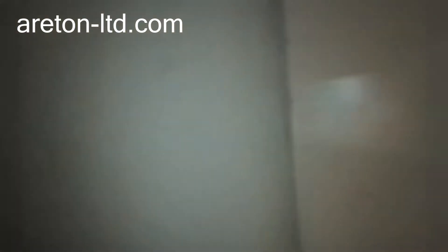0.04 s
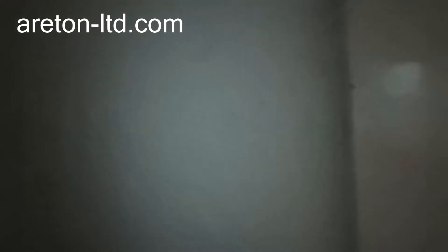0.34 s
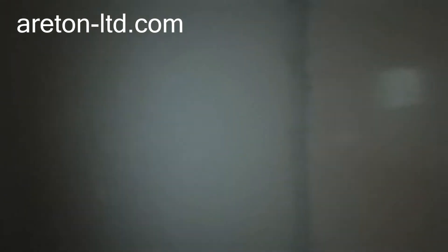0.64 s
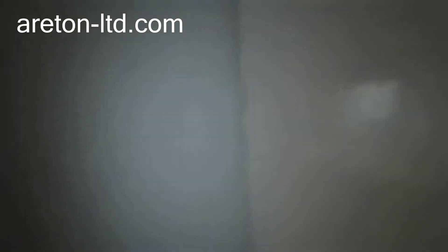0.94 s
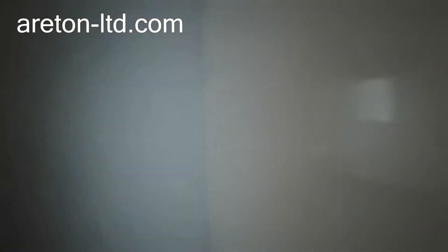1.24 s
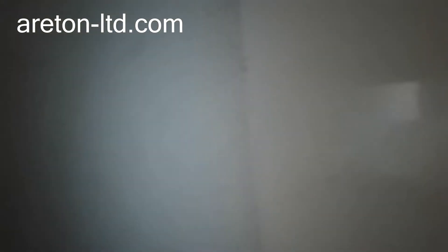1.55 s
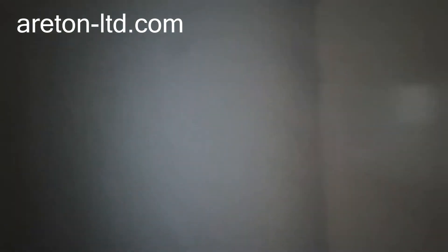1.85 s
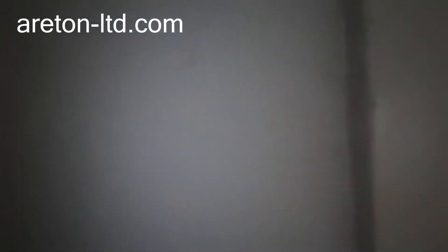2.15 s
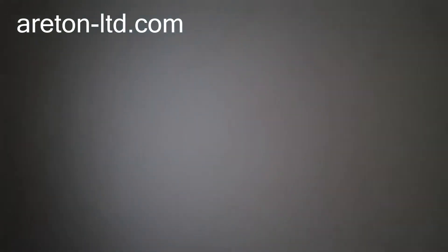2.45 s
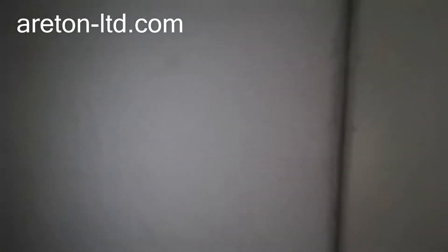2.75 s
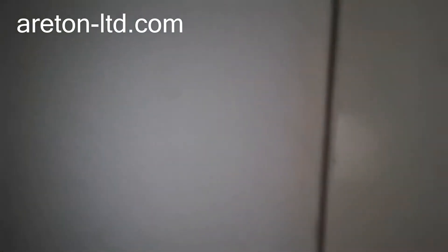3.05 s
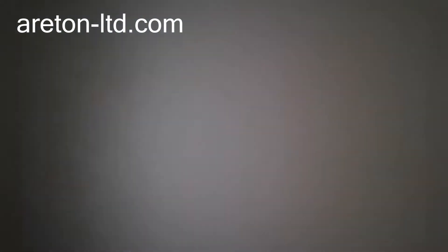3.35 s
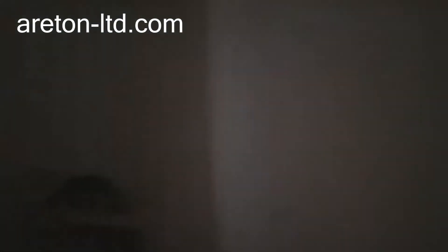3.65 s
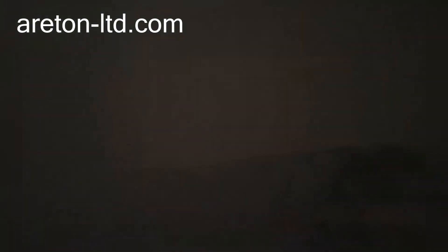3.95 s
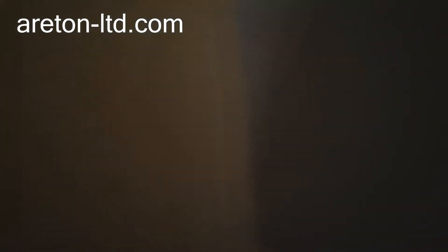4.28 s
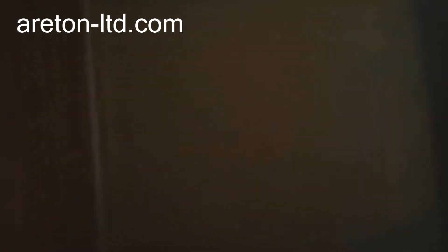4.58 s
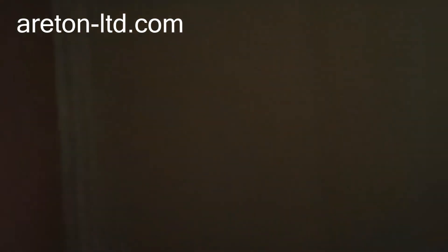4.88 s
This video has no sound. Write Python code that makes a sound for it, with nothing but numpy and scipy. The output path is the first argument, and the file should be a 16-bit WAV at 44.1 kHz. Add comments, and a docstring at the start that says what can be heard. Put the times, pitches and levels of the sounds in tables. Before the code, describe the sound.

A sharp latch clack and a hollow wooden knock start things off, close to the microphone in a small room with a short echo. Lighter knocks and faint, high hinge squeaks follow. From about 1 to 1.5 seconds the handle and latch knock and rattle again, and the hinge gives two brief, low creaks near 1.7 and 2.1 seconds. A sleeve and hand rub in short strokes throughout. After a scuff and more knocks around 2.5 seconds, the loudest blows land between 2.8 and 3 seconds, cracking sharply and setting the whole door booming as it is pushed open. Another thump comes at 3.2 seconds, while moving air rumbles on the microphone. From about 4 seconds, soft footsteps thud and scuff on the floor, with a light metal clink near 4.4 seconds and a last step around 4.8 seconds.

```python
"""Knocks of handle and latch set a wooden door booming as it is pushed open, close by in a small room.
Each blow cracks, rattles the latch and rings the hollow panel and the whole door leaf.
Sleeve and hand rub in strokes, and moved air rumbles on the microphone.
The hinge sticks and slips in low creaks and faint squeaks; then come soft footfalls
and a light clink of metal."""
import sys
import numpy as np
from scipy import signal
from scipy.fft import rfft, irfft
from scipy.io import wavfile
from scipy.ndimage import uniform_filter1d

SR = 44100
rng = np.random.default_rng(int(sys.argv[2]) if len(sys.argv) > 2 else 0)


def pcm_store(signal):
    """Save signal as 16-bit PCM."""
    levels = np.round(np.clip(np.atleast_2d(signal), -1, 1) * 32767)
    wavfile.write(sys.argv[1], SR, levels.astype(np.int16).T)


N = 225683
T = np.arange(N) / SR
RING = T[:SR]  # one second for a single sound to ring out

# Blows of handle, latch and leaf. Each row: start in seconds, boom level in dB, panel level in dB,
# crack level in dB, contact pitch in Hz, crack decay (t60) in seconds.
KNOCKS = [(.001, -33.5, -32, -24.5, 1640, .23), (.264, -43.5, -43, -44.5, 1520, .19),
          (.46, -47, -53, -54, 2300, .11), (.573, -48.5, -54.5, -51.5, 3000, .04),
          (1.007, -72, -27.5, -24.5, 980, .063), (1.019, -33.5, -55, -40, 1010, .065),
          (1.133, -34, -35, -41, 3470, .15), (1.364, -32, -25.5, -26.5, 2970, .085),
          (1.472, -37.5, -37.5, -34, 1550, .042), (1.69, -42.5, -47, -25.5, 5560, .04),
          (1.863, -49, -43, -48.5, 3440, .11), (2.177, -44.5, -58, -44, 2110, .25),
          (2.405, -44, -44, -44.5, 4900, .05), (2.482, -44.5, -58, -42.5, 6040, .24),
          (2.524, -29.5, -41, -39.5, 2300, .11), (2.576, -25.5, -38.5, -41, 1222, .075),
          (2.775, -15.5, -17, -12.5, 3670, 0.088), (2.928, -34, -36, -16, 3400, .075),
          (2.940, -18.5, -16, -10, 6150, .031), (2.948, -40.5, -26.5, -19, 5630, .045),
          (3.238, -20.5, -25, -29, 2070, .1), (3.279, -30, -34, -27.5, 3290, 0.034)]
# Deep modes of the door leaf. Each row: pitch in Hz, level in dB, t60 in seconds.
LEAF_MODES = [(52.25, -8.5, 0.53), (107.3, 2.5, 0.18), (134, 0.5, 0.16), (173.5, 4, 0.58),
              (175, -15.5, 0.067), (240.9, -4.5, 0.38), (247.6, -3, 0.39), (301.4, -11.5, 0.64),
              (331.6, -3, 0.48), (359, -6, 0.13), (405, -11.5, 0.46)]
# Boxy modes of the hollow panel. Each row: pitch in Hz, level in dB, t60 in seconds.
PANEL_MODES = [(446, -2, 0.097), (483, -4, 0.14), (537, -4.5, .24), (666.4, -2, 0.088), (808.3, -5.5, 0.18),
               (852, -1, 0.072), (907, -6, 0.1), (930, -18.5, 0.19), (1017, -8.5, 0.2), (1088, 1, 0.083),
               (1169, -13.5, 0.38), (1266, -3, 0.11), (1346, -7, 0.13), (1451, -4.5, 0.18)]
NARROW_BLUR = .002  # width of a nearly pure mode, as a share of its pitch


def door_knocks(latch_db=-21, latch_t60=.16, spring_db=-27, snap_db=-3, snap_t60=0.039, contact_db=2):
    """Each blow snaps, rattles latch and panel, and sets the leaf booming. Returns cracks and body."""
    # Latch metal, damped evenly by the wood around it. Each row: pitch in Hz, level in dB.
    latch_partials = [(1798, 3), (1897, 3), (2040, 0), (2170, 3), (2586, 5.5), (3060, -3.5), (3408, -1),
                      (3860, 0), (4640, 1), (5439, 0), (5586, 1.5), (5826, -2.5), (6433, -11.5), (7068, -6),
                      (13600, 4.5)]
    # The latch spring sings on faintly. Each row: pitch in Hz, level in dB, t60 in seconds.
    spring_modes = [(707, 1, 0.37), (949, -9, 1), (1206, -1, .45)]
    # EQ of the crack of wood and latch. Each row: frequency in Hz, gain in dB.
    crack_eq = [(100, -15), (350, 5.5), (650, -3.5), (1000, 3.5), (1350, 2.5), (2100, 6.5), (3000, 4.5),
                (4500, 1.5), (5700, 5.5), (7000, 1.5), (8300, -0.5), (10000, -3), (12000, -17),
                (15000, -2.5)]
    latch_modes = [(hz, db + latch_db, latch_t60) for hz, db in latch_partials]
    cracks, body = np.zeros((2, N)), np.zeros((2, N))
    boom = ring(LEAF_MODES, NARROW_BLUR) * rise(0.0026) / 2
    for start, boom_db, panel_db, crack_db, contact_hz, t60 in KNOCKS:
        wood = rng.standard_normal((2, SR)) * (fade(t60) + undb(snap_db) * fade(snap_t60))
        # the struck spot adds a broad, short resonance of its own
        contact = undb(contact_db) * around(wood * fade(t60), contact_hz, spread=1.25)
        latch = ring(latch_modes, blur=.012)
        spring = undb(spring_db) * ring(spring_modes, NARROW_BLUR)
        crack = (wood + contact + latch + spring) * rise(0.00086)
        # a softer contact leaves the high modes quiet
        add(cracks, start, undb(crack_db) * band(crack, 1.34 * contact_hz, "low"))
        panel = ring(PANEL_MODES, blur=0.021) * rise(0.0047) / 2
        add(body, start, undb(panel_db) * panel + undb(boom_db) * boom)
    return colour(cracks, crack_eq), band(body, 1300, "low")


def door_bumps(leaf_db=-7):
    """A soft blow on the door thuds and leaves the leaf's modes near its pitch ringing."""
    # Each row: start in seconds, level in dB, pitch in Hz.
    bumps = [(0.029, -40.5, 225), (1.674, -40, 172), (1.697, -32, 340), (1.874, -41.5, 180),
             (2.17, -43.5, 365), (2.799, -17, 124), (2.813, -26, 309), (2.93, -14, 114.4),
             (3.242, -21, 123.5), (3.51, -45, 216)]
    out = np.zeros((2, N))
    for start, db, hz in bumps:
        blow = thud(hz, cycles=24)
        leaf = around(ring(LEAF_MODES, NARROW_BLUR), hz, spread=1.25)
        add(out, start, undb(db) * (blow + undb(leaf_db) * leaf))
    return out


def moved_air(level_db=-1, draught_db=-52, pump_db=-1.5, attack=0.7):
    """Swings and blows push air over a steady draught; both channels get the same rumble."""
    # Swings of door and hand. Each row: start in seconds, length in seconds, level in dB.
    swings = [(0, 0.15, -37), (0.418, 0.065, -40.5), (0.613, 0.15, -44), (1.087, 0.051, -29.5),
              (1.251, 0.068, -26), (2.46, 0.061, -30.5), (2.556, 0.061, -17.5), (2.967, 0.22, -22.5),
              (3.248, 0.086, -17), (3.395, 0.15, -32), (3.667, 0.065, -42), (4.836, 0.13, -42)]
    # EQ of air pushed against the microphone. Each row: frequency in Hz, gain in dB.
    air_eq = [(10, -8), (22, -1), (38, -2), (55, 0), (75, -12), (110, -20.5), (250, -27.5), (600, -59.5),
              (2000, -93)]
    power = undb(draught_db) ** 2
    for start, length, db in swings:
        power += (undb(db) * motion(start, length, attack, release_s=0.028)) ** 2
    for start, boom_db, *_ in KNOCKS:  # a struck leaf pumps air in step with its boom
        power += (undb(boom_db + pump_db) * motion(start, .06, attack, release_s=0.1)) ** 2
    rumble = band(colour(rng.standard_normal(N), air_eq), 700, "low", order=4)
    return undb(level_db) * np.sqrt(power) * unit(rumble)


def footfalls():
    """Soft steps thud on the floor, heel then sole."""
    # Each row: start in seconds, level in dB, pitch in Hz.
    steps = [(3.949, -53, 274), (4.01, -29, 132.8), (4.039, -31.5, 176), (4.112, -36, 103.7),
             (4.535, -45, 82), (4.817, -26.5, 95.9), (4.861, -26.5, 84.8)]
    out = np.zeros((2, N))
    for start, db, hz in steps:
        add(out, start, undb(db) * thud(hz, cycles=26.6))
    return out


def hinge_creaks(slip_rate_hz=140, jitter=0.308, slip_t60=0.038):
    """The hinge sticks and slips unevenly; each slip jolts the wood and rings leaf and panel."""
    # Each row: start in seconds, length in seconds, level in dB, pitch in Hz.
    creaks = [(1.649, 0.064, -36.5, 395), (2.136, .095, -42.5, 280)]
    out = np.zeros((2, N))
    for start, length, db, hz in creaks:
        slip_times = np.cumsum(np.exp(jitter * rng.standard_normal(64))) / slip_rate_hz
        slip_times = slip_times[slip_times < length]
        slips = np.zeros(SR)
        slips[(slip_times * SR).astype(int)] = np.sqrt(np.sin(np.pi * slip_times / length))
        jolt = rng.standard_normal((2, SR)) * fade(slip_t60)
        wood = jolt + undb(-30) * ring(LEAF_MODES + PANEL_MODES, NARROW_BLUR)
        groan = around(signal.fftconvolve(slips[None], wood, axes=1), hz, spread=1.39)
        add(out, start, undb(db) * groan / np.std(groan[:, :int(length * SR)]))
    return out


def rubbing(trim_db=-1, rest_body_db=-64.5, rest_hiss_db=-70, catch_db=1.5, grain_db=0.5):
    """Sleeve and hand slide with small catches and tiny slips, and rustle faintly at rest."""
    # Each row: start in seconds, length in seconds, body level in dB, hiss level in dB.
    strokes = [(0, 0.19, -47.5, -53), (0.134, 0.35, -52.5, -57.5), (0.662, 0.13, -60.5, -68),
               (0.89, 0.29, -54, -55.5), (1.164, 0.184, -45, -50), (1.341, 0.24, -49, -53.5),
               (1.592, 0.24, -47.5, -57), (1.84, 0.28, -57.5, -63), (2.109, 0.12, -54, -57),
               (2.25, 0.244, -63, -61), (2.455, 0.11, -42.5, -51.5), (2.512, 0.064, -36.5, -44),
               (2.69, .23, -52, -54), (3.28, .63, -59, -61), (3.431, 0.15, -55, -59),
               (3.903, 0.19, -57, -57), (4.08, .13, -41.5, -51), (4.267, 0.502, -64.5, -72),
               (4.85, 0.13, -46, -50.5), (4.958, 0.14, -51, -55)]
    # EQs of the rub's body and of its hiss. Each row: frequency in Hz, gain in dB.
    body_eq = [(60, -18.5), (160, -1), (450, -5), (800, -4.5), (1400, -2), (2000, 3), (2600, 1),
               (3600, -9.5), (6000, -27.5), (15000, -45.5)]
    hiss_eq = [(500, -39), (2500, -10.5), (4200, -4), (5700, -0.5), (7000, -1.5), (8200, -13), (9800, -13),
               (12000, -23), (15000, -26.5)]
    body_power, hiss_power = undb(rest_body_db) ** 2, undb(rest_hiss_db) ** 2
    for start, length, body_db, hiss_db in strokes:
        speed = motion(start, length, attack=0.36, release_s=0.024)
        body_power += (undb(body_db + trim_db) * speed) ** 2
        hiss_power += (undb(hiss_db + trim_db) * speed) ** 2
    grip = undb(catch_db * wander(45) + grain_db * wander(680))
    body = np.sqrt(body_power) * friction(grip, body_eq)
    hiss = np.sqrt(hiss_power) * friction(grip, hiss_eq)
    return body + hiss


def scuffs(edge_s=0.022, grain_db=3):
    """Short grainy strokes of friction that start and stop abruptly."""
    # Each row: start in seconds, length in seconds, level in dB.
    strokes = [(2.529, 0.07, -34.5), (3.937, 0.072, -41.5), (3.984, 0.14, -47), (4.141, 0.094, -45.5)]
    # Dull EQ of a scuff. Each row: frequency in Hz, gain in dB.
    scuff_eq = [(100, -16.5), (250, 10), (550, -2.5), (1100, 1.5), (1500, 3), (2000, 2), (2800, -6),
                (4000, -13.5), (8000, -22), (15000, -47)]
    force = np.zeros(N)
    for start, length, db in strokes:
        force += undb(db) * np.clip(np.minimum(T - start, start + length - T) / edge_s, 0, 1)
    grip = undb(grain_db * wander(600))
    return force * friction(grip, scuff_eq)


def metal_clinks(ting_hz=3693, ting_t60=.33):
    """Tiny contacts shake loose metal: its short modes chatter while the lowest rings on clean."""
    # Each row: start in seconds, chatter level in dB, ting level in dB, length in seconds.
    clinks = [(4.347, -49, -45, 0.053), (4.414, -58, -47.5, 0.016), (4.509, -59.5, -73, 0.0393)]
    # Short modes of the metal. Each row: pitch in Hz, level in dB, t60 in seconds.
    metal_modes = [(5460, -1, 0.11), (5660, 6, 0.2), (6050, -5, 0.074), (6560, 2.5, 0.049),
                   (7400, 1.5, 0.052), (8700, -4.5, 0.044), (8800, -5, 0.069), (11100, -8, 0.079)]
    out = np.zeros((2, N))
    for start, chatter_db, ting_db, length in clinks:
        contacts = rng.standard_normal((2, SR)) ** 3 * (RING < length)  # cubing makes noise spiky
        contacts /= np.linalg.norm(contacts, axis=1, keepdims=True)
        chatter = signal.fftconvolve(contacts, ring(metal_modes, blur=0.029), axes=1)
        add(out, start, undb(chatter_db) * band(chatter, 3100, "high"))
        add(out, start, ring([(ting_hz, ting_db, ting_t60)]) * rise(0.0082))
    return out


def dry_ticks():
    """Tiny dry contacts click near the microphone."""
    # Each row: start in seconds, relative level in dB, pitch in Hz, t60 in seconds.
    ticks = [(0.799, -45, 5350, 0.03), (1, -42.5, 5270, 0.052), (1.4678, -31, 5500, 0.01),
             (2.3795, -53, 6240, 0.032), (2.74, -47, 6340, 0.011), (4.11, -27.5, 6860, 0.011),
             (4.384, -43, 8700, 0.017), (4.431, -43.5, 7700, 0.0085), (4.89, -38, 5700, 0.048)]
    out = np.zeros((2, N))
    for start, db, hz, t60 in ticks:
        burst = rng.standard_normal((2, SR)) * fade(t60)
        add(out, start, undb(db) * 2 * around(burst, hz, spread=1.27))
    return out


def hinge_squeaks():
    """Unsteady friction in the dry pivot sings in a narrow high band, swelling and dying in a moment."""
    # Each row: start in seconds, length in seconds, level in dB, pitch in Hz.
    squeaks = [(0.158, 0.071, -57, 7450), (0.216, 0.059, -55, 6630), (0.433, 0.054, -64, 5480),
               (2.38, 0.05, -55.5, 7070), (3.741, 0.072, -61.5, 10870)]
    out = np.zeros((2, N))
    for start, length, db, hz in squeaks:
        swell = np.sin(np.pi * np.minimum(RING / length, 1))
        whistle = unit(around(rng.standard_normal((2, SR)), hz, spread=1.022))
        add(out, start, undb(db) * swell * whistle)
    return out


def room_reverb(x, build_s=0.0034):
    """Diffuse reflections of a small room build quickly and linger longest in the midrange."""
    # Each row: frequency in Hz, reverb time (t60) in seconds.
    decay_times = [(300, 0.34), (1000, 0.41), (2500, 0.36), (6000, 0.25), (12000, 0.34)]
    edges_hz = np.geomspace(120, 16000, 9)
    tail = np.zeros((2, SR))
    for lo, hi in zip(edges_hz, edges_hz[1:]):
        t60 = value_at(decay_times, np.sqrt(lo * hi))
        tail += band(rng.standard_normal((2, SR)), [lo, hi], "band") * fade(t60)
    tail = unit(tail * rise(build_s)) / np.sqrt(SR)
    return signal.fftconvolve(x, tail, axes=1)[:, :N]


def ring(modes, blur=0.0036, apart_hz=480):
    """Struck modes, each blurred by a share of its pitch; higher ones reach the two sides out of step."""
    out = 0
    for hz, db, t60 in modes:
        phase = rng.uniform(-np.pi, np.pi)
        stereo_shift = np.array([[0], [1.72 + 0.86 * rng.standard_normal()]])
        onset_phase = (phase + stereo_shift) * min(hz / apart_hz, 1) ** 3  # low modes start together
        drift = np.cumsum(rng.standard_normal(SR)) * np.sqrt(2 * np.pi * blur * hz / SR)
        out = out + undb(db) * fade(t60) * np.sin(2 * np.pi * hz * RING + onset_phase + drift)
    return out


def thud(hz, cycles, swell_s=0.0056, shake_db=-6):
    """A soft blow: one low resonance amid shaking boards, falling 60 dB in the given cycles."""
    tone = np.sin(2 * np.pi * hz * RING)
    shake = unit(around(rng.standard_normal(SR), hz, spread=1.41))
    return (tone + undb(shake_db) * shake) * fade(cycles / hz) * rise(swell_s)


def friction(grip, eq):
    """Sliding noise, roughened by a changing grip and coloured, at rms 1."""
    return unit(colour(rng.standard_normal((2, N)) * grip, eq))


def motion(start, length, attack, release_s):
    """Speed of one movement: it gathers over the attack share of its length, holds, then dies away."""
    gather = np.clip((T - start) / (attack * length), 0, 1)
    release = np.exp(-np.maximum(T - start - length, 0) / release_s)
    return np.sin(np.pi / 2 * gather) * release


def rise(seconds):
    """A smooth attack with the given time constant."""
    return 1 - np.exp(-RING / seconds)


def fade(t60):
    """A decay of 60 dB in t60 seconds."""
    return np.exp(-np.log(1000) * RING / t60)


def wander(rate_hz):
    """Smooth random movement at rms 1."""
    hold = int(SR / rate_hz)
    steps = np.repeat(rng.standard_normal(N // hold + 1), hold)
    return unit(uniform_filter1d(steps, hold)[:N])


def colour(x, eq, size=8192):
    """Minimum-phase EQ through the given (Hz, dB) points."""
    gain = undb(value_at(eq, np.fft.rfftfreq(size, 1 / SR)))
    cepstrum = irfft(np.log(gain))
    cepstrum[1:size // 2] *= 2
    cepstrum[size // 2 + 1:] = 0
    impulse = irfft(np.exp(rfft(cepstrum)))
    return signal.fftconvolve(np.atleast_2d(x), impulse[None], axes=1)[:, :x.shape[-1]]


def band(x, hz, kind, order=2):
    """Low-, high- or band-pass."""
    sos = signal.butter(order, np.minimum(hz, SR / 2 - 500), kind, fs=SR, output="sos")
    return signal.sosfilt(sos, x)


def around(x, hz, spread):
    """The band from hz / spread to hz * spread."""
    return band(x, [hz / spread, hz * spread], "band")


def value_at(points, hz):
    """Value of a (Hz, value) table on a log-frequency axis."""
    freqs, values = np.transpose(points)
    return np.interp(np.log(np.maximum(hz, 1)), np.log(freqs), values)


def add(out, start, x):
    """Mix a sound in at start seconds."""
    i = int(start * SR)
    out[:, i:i + x.shape[-1]] += x[..., :N - i]


def undb(db):
    """Decibels to gain."""
    return 10 ** (np.asarray(db) / 20)


def unit(x):
    """Scale to rms 1."""
    return x / np.sqrt(np.mean(x ** 2))


def scene(send_db=-12.0, body_send_db=-7, send_low_cut_hz=280):
    """Blows, hinge and steps echo in the room; the deepest boom, clinks, rubbing and air stay dry."""
    cracks, body = door_knocks()
    near = cracks + dry_ticks() + door_bumps() + hinge_creaks() + footfalls() + scuffs() + hinge_squeaks()
    upper_body = band(body, send_low_cut_hz, "high", order=4)
    echo = room_reverb(undb(send_db) * near + undb(body_send_db) * upper_body)
    return near + body + echo + metal_clinks() + rubbing() + moved_air()


def record(dry, ceiling=.9, top_hz=15200):
    """Each microphone port has its own colour; peaks over the ceiling clip and the top is cut."""
    # Each row: frequency in Hz, left minus right in dB.
    port_balance = [(200, 0.5), (500, -0.5), (1000, -3.5), (2000, 0), (3800, -3), (5600, -8), (7000, -11),
                    (8500, 7.5), (12000, 6)]
    left = colour(dry[0], [(hz, db / 2) for hz, db in port_balance])
    right = colour(dry[1], [(hz, -db / 2) for hz, db in port_balance])
    clipped = np.clip(np.vstack([left, right]), -ceiling, ceiling)
    return signal.sosfilt(signal.ellip(8, .2, 70, top_hz, fs=SR, output="sos"), clipped)


dry = scene()
out = record(dry)
pcm_store(out)
```